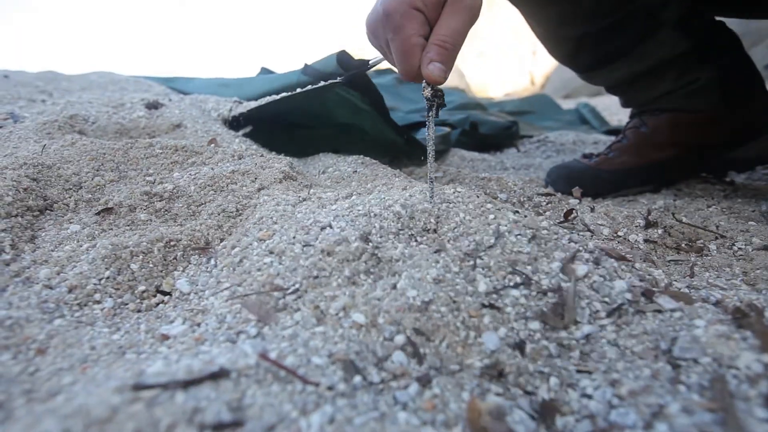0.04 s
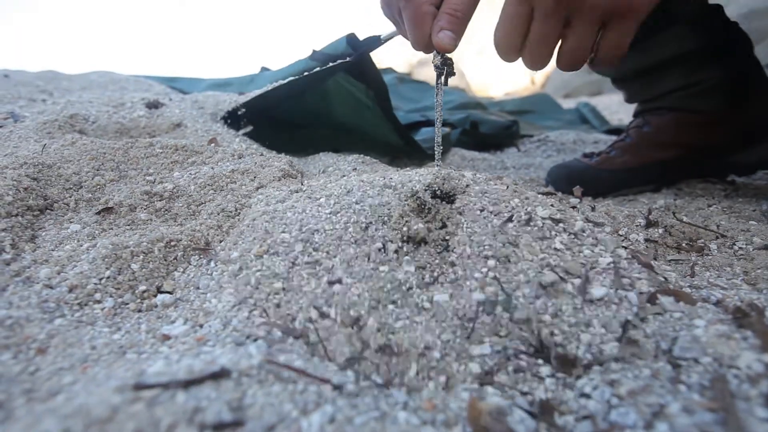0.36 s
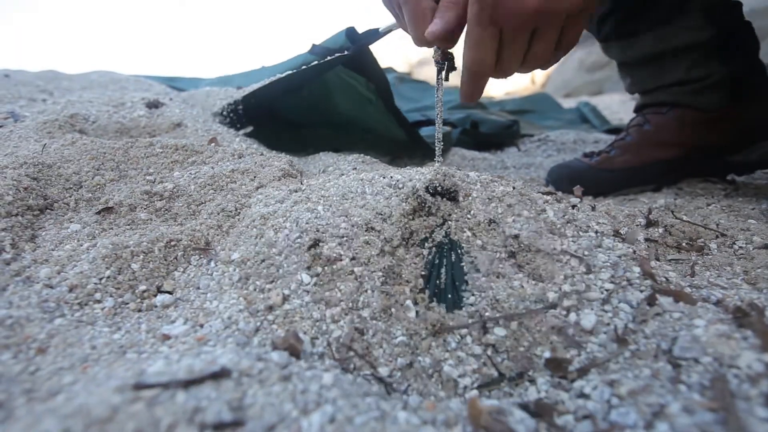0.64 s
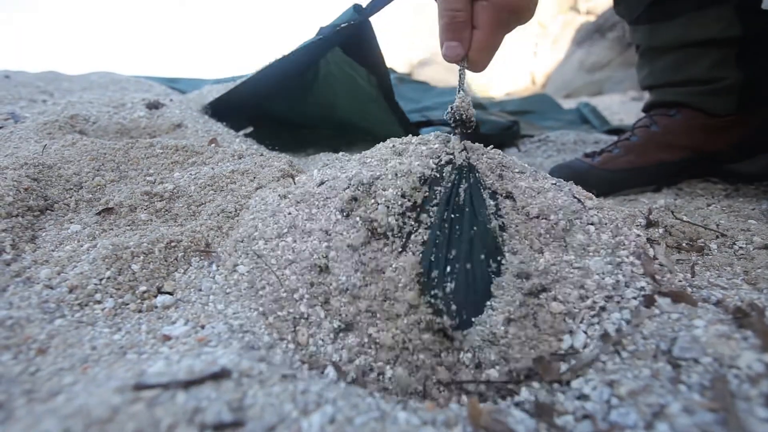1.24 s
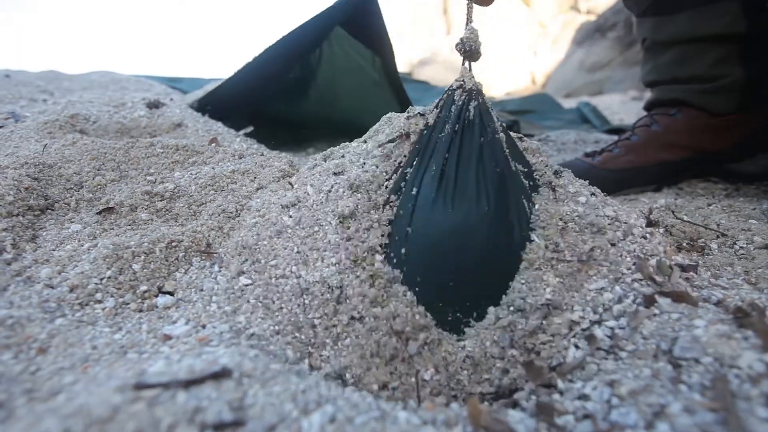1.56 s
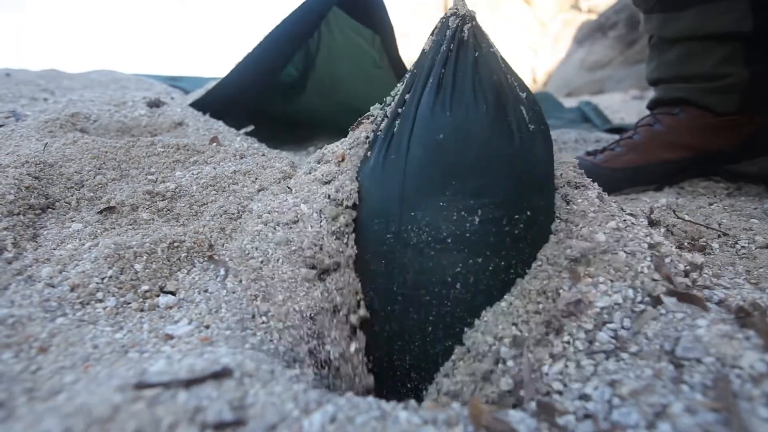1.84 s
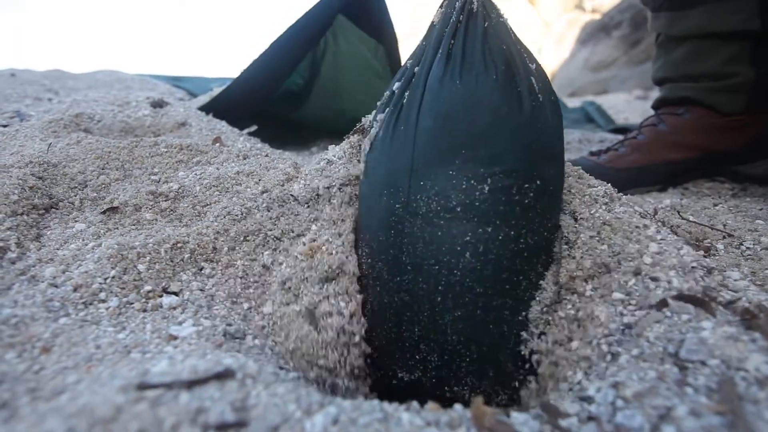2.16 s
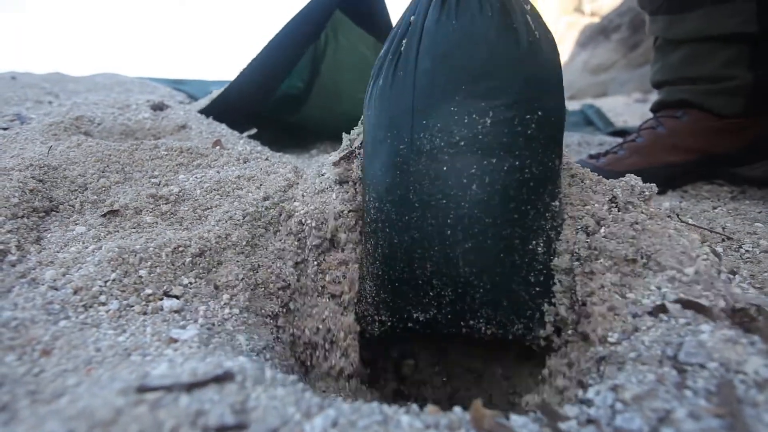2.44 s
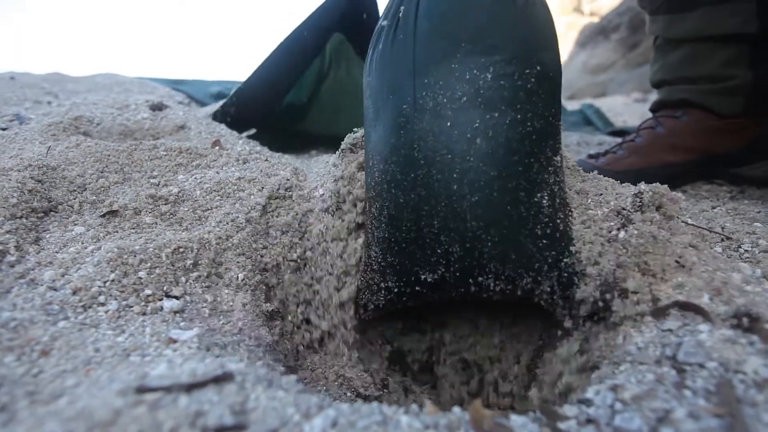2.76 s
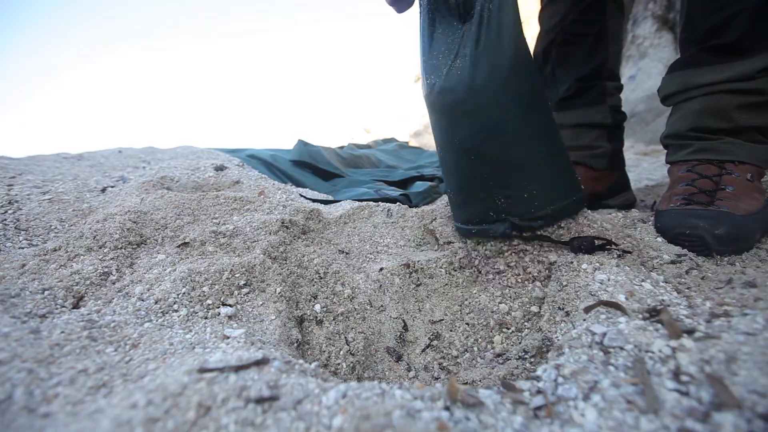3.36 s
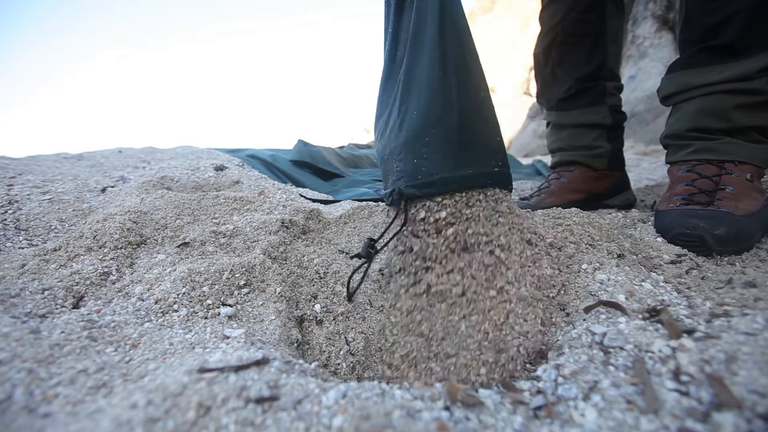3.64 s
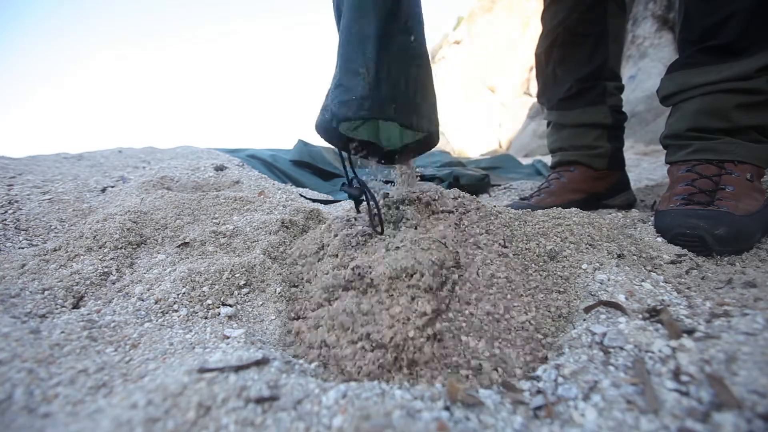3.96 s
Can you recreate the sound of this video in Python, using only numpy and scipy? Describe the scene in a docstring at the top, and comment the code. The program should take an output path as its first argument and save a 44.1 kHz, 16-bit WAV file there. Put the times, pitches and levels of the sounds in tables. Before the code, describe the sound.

Close up on a beach, gritty sand slips, trickles, then streams off a cloth bag being lifted out, with small pebble ticks and fabric scuffs. The bag thuds softly and empties in two spurts and a longer pour.

```python
"""A cloth bag buried in coarse beach sand is drawn up by its cord, heard close and in mono.
First the mound slips in a hiss of countless grains, with a few pebble ticks and a soft thud of the bag.
The slide thins to a trickle, the cloth scuffs, and the cord creaks once as it takes the load.
Sand streams off the rising bag, the cloth rubs again, and the mound caves into the hole.
Last, the bag thuds as it lifts clear and empties itself in two spurts and a long pour."""
import sys
import numpy as np
from scipy import signal
from scipy.fft import rfft, irfft
from scipy.io import wavfile

SR = 44100
rng = np.random.default_rng(int(sys.argv[2]) if len(sys.argv) > 2 else 0)


def to_wav(s):
    """Save 16-bit WAV."""
    ch = np.atleast_2d(s).T  # columns
    pcm = np.round(np.clip(ch, -1, 1) * 32767)  # PCM
    wavfile.write(sys.argv[1], SR, pcm.astype(np.int16))


N = 176400

# Fader moves of each sand flow (time [s], treble hiss [dB], mid crunch [dB], low rustle [dB])
MOUND_SLIP = [(0, -29.5, -29, -37.5), (.22, -30.5, -30, -40.5), (.3, -21, -23.5, -32),
              (.34, -21, -20.5, -38.5), (.38, -21.5, -26, -34), (.43, -23, -24, -41), (.535, -25, -28, -39),
              (.58, -31, -36.5, -53)]
TRICKLE = [(.58, -30, -34, -42), (.7, -35.5, -38, -44), (.76, -34.5, -42.5, -46.5),
           (.82, -40, -40.5, -46.5), (.87, -39.5, -39, -43)]
OFF_THE_BAG = [(.87, -31, -38, -52), (.9, -34, -35.5, -42), (.95, -23.5, -26, -35.5), (.98, -25, -26, -36),
               (1.14, -19, -23, -34), (1.29, -19, -22.5, -37), (1.35, -22.5, -26, -34),
               (1.52, -21, -24.5, -40.5), (1.63, -18.5, -23, -37.5), (1.8, -21.5, -26, -38),
               (1.95, -26, -26.5, -34.5), (2.06, -26, -30.5, -43.5)]
CAVE_IN = [(2.06, -27.5, -30.5, -44), (2.19, -24.5, -26.5, -40), (2.3, -27.5, -29, -37.5),
           (2.45, -24.5, -29, -38), (2.6, -26.5, -30.5, -39), (2.7, -21, -29.5, -45),
           (2.76, -26, -33, -40.5), (2.87, -28, -30.5, -40), (2.97, -24.5, -34, -41)]
POUR = [(2.97, -37, -31, -53), (3.0, -20, -23, -35), (3.03, -17.5, -20, -34.5), (3.085, -25.5, -27, -40),
        (3.11, -21, -21.5, -35), (3.146, -19, -22, -32.5), (3.22, -23, -24.5, -38.5),
        (3.29, -21, -22.5, -36.5), (3.35, -17.5, -19.5, -32.5), (3.44, -20, -21, -35.5),
        (3.6, -19, -22, -33.5), (3.69, -24, -24.5, -40), (3.76, -23, -26, -38.5), (3.82, -33, -38.5, -50.5),
        (3.87, -35, -46, -77), (3.92, -34, -39.5, -61), (4, -35, -48, -80)]
# Tone of each flow (frequency [Hz], relative gain [dB])
MOUND_SLIP_EQ = [(35, -47), (60, -16), (167, -10.5), (231, -15.5), (259, -12), (443, -7.5), (869, -8.5),
                 (1200, -4.5), (1350, -7), (1480, -3.5), (2150, -3.5), (2980, -5.5), (3500, -2), (5980, 0),
                 (7720, -3.5), (11200, -18), (15500, -35)]
TRICKLE_EQ = [(40, -24), (100, -8.5), (200, -5.5), (350, -10), (650, -9), (950, -11), (1250, -6.5),
              (1650, -8.5), (2100, -6), (2800, -11), (3500, -4.5), (4600, -7), (7000, -3), (9000, -14),
              (15500, -36)]
OFF_THE_BAG_EQ = [(35, -59), (60, -32), (129, -25), (187, -24.5), (220, -23.5), (305, -23), (433, -19),
                  (559, -17), (869, -20), (976, -18.5), (1590, -10.5), (1740, -10), (2100, -6), (2910, -6),
                  (3930, -1.5), (4320, -3), (6870, 1), (10200, -11.5), (15500, -31.5)]
CAVE_IN_EQ = [(35, -52), (60, -37), (115, -20.5), (201, -17), (291, -20.5), (312, -21.5), (464, -13),
              (792, -16), (976, -14), (1590, -8.5), (1790, -11), (2050, -6), (2310, -9), (2590, -5.5),
              (2780, -7), (4630, -4.5), (6870, 1), (10200, -13), (15500, -31)]
POUR_EQ = [(35, -61), (60, -35), (167, -19), (242, -16), (475, -12), (521, -10.5), (810, -14), (976, -12),
           (1070, -11.5), (1550, -10.5), (2410, -10.5), (3500, -6), (5200, -5), (6410, -0.5), (7030, -2),
           (15500, -33.5)]
# Edges of the rustle, crunch and hiss bands (frequency [Hz])
BAND_EDGES = [60, 1300, 5000, 16000]
# The flows in playing order (fader moves, tone)
FLOWS = [(MOUND_SLIP, MOUND_SLIP_EQ), (TRICKLE, TRICKLE_EQ), (OFF_THE_BAG, OFF_THE_BAG_EQ),
         (CAVE_IN, CAVE_IN_EQ), (POUR, POUR_EQ)]
GRAINS_PER_S, FULL_FLOW_DB, CROWDING = 30000, -20, .7  # density at full flow; it goes as power ** CROWDING
CLUMP_HZ, CLUMP_DB, BAND_FLUTTER_DB = 48, .5, .12


def sand(flow, eq):
    """Grain impacts blur into a hiss, denser when more sand moves, falling in loose clumps."""
    t = np.arange(N) / SR
    times, hiss, crunch, rustle = np.transpose(flow)
    inside_s = np.minimum(t - times[0], times[-1] - t)
    crossfade = np.sqrt(np.clip(.5 + inside_s / .04, 0, 1))  # equal power, 40 ms at each end
    flow_power = amp(np.interp(t, times, hiss) - FULL_FLOW_DB) ** 2
    density = np.minimum(GRAINS_PER_S * flow_power ** CROWDING, SR)
    clumps_db = CLUMP_DB * wander(CLUMP_HZ)
    stream = np.zeros(N)
    for k, fader in enumerate([rustle, crunch, hiss]):
        clicks = impacts(density, spread_db=3) / np.sqrt(density)  # same power at any density
        grains = coloured(clicks, eq, BAND_EDGES[k:k + 2])
        flutter_db = clumps_db + BAND_FLUTTER_DB * wander(CLUMP_HZ)
        stream += grains * amp(np.interp(t, times, fader) + flutter_db)
    return stream * crossfade


GRIT_PER_S, GRIT_DB, GRIT_FOLLOW = 140, -27.5, .95  # GRIT_FOLLOW: dB of grit per dB of hiss


def grit():
    """Grit of many sizes bounces clear of the stream: bright ticks that ride the level of the hiss."""
    times, hiss = np.vstack([flow for flow, _ in FLOWS]).T[:2]
    flow_db = np.interp(np.arange(N) / SR, times, hiss) - FULL_FLOW_DB
    pitches_hz = np.geomspace(3200, 10000, 24)
    ticks = np.zeros(N)
    for hz in pitches_hz:
        bounces = impacts(GRIT_PER_S / len(pitches_hz), spread_db=2.5)
        ticks += signal.oaconvolve(bounces, pebble(hz))[:N]
    return amp(GRIT_DB + GRIT_FOLLOW * flow_db) * ticks


# Single pebble ticks (time [s], peak level [dB], pitch [Hz])
PEBBLES = [(.031, -19, 5500), (.1478, -12, 4400), (.723, -19, 6500), (.828, -17, 7000), (.957, -11, 4700),
           (.964, -4, 7150), (.966, -10, 7000), (1.365, -7, 7240), (1.478, -19, 6500)]
STRIKE_S, RING_CYCLES, TICK_TOP_HZ = .00008, 2.8, 11000


def pebble(hz):
    """A struck stone rings for a few cycles, its very top end rolled off; peak 1."""
    t = np.arange(256) / SR
    envelope = (1 - np.exp(-t / STRIKE_S)) * np.exp(-t * hz / RING_CYCLES)
    ring = envelope * np.sin(2 * np.pi * hz * t)
    tick = signal.lfilter(*signal.butter(4, TICK_TOP_HZ, fs=SR), ring)
    return tick / abs(tick).max()


# Scuffs of cord and cloth (time [s], decay [s], level [dB], rasp over ring [dB], attack [s])
SCUFFS = [(0.686, .010, -27.5, 8, 0.0011), (0.693, 0.037, -36, -7, 0.0055), (0.8, .008, -30, -17, 0.00049),
          (0.816, 0.019, -31, -18, .008), (1.878, 0.078, -36, -5, .01), (1.924, 0.074, -30, -6, 0.019),
          (3.905, 0.0099, -38, 9, 0.0015)]
# Tone of a scuff's two layers (frequency [Hz], relative gain [dB])
RING_EQ = [(200, -30), (800, -3), (1030, -14), (1180, 6.5), (1400, 6), (1650, -10), (2100, -6), (3000, -36),
           (9000, -55)]
RASP_EQ = [(80, -29), (280, 5), (600, 1), (1000, -3), (2100, 4.5), (2800, -12), (3500, 0), (4600, -12),
           (9000, -26)]


def scuff(decay_s, db, rasp_db, attack_s):
    """Cord and cloth snatch or rub: friction noise with a hollow ring and a wide rasp."""
    t = np.arange(SR // 4) / SR
    ring = coloured(rng.standard_normal(len(t)), RING_EQ)
    rasp = coloured(rng.standard_normal(len(t)), RASP_EQ)
    envelope = np.minimum(t / attack_s, 1) * np.exp(-(t / decay_s) ** 2.2)
    return amp(db) * unit_rms(ring + amp(rasp_db) * rasp) * envelope


CREAK_START_S, CREAK_LENGTH_S, CREAK_DB, CREAK_FADE_DB = 1.0025, .068, -37.5, -8
SLIP_HZ, SLIP_JITTER, BAG_HZ, BAG_RING_S = 107.2, .086, 187, .0042


def cord_creak():
    """The taut cord sticks and slips; each slip nudges the packed bag, which rings dully."""
    t = np.arange(0, CREAK_LENGTH_S, 1 / SR)
    slip_hz = SLIP_HZ * (1 + SLIP_JITTER * wander(SLIP_HZ)[:len(t)])
    slip_count = np.floor(np.cumsum(slip_hz) / SR)
    slips = np.diff(slip_count, prepend=-1) * amp(CREAK_FADE_DB * t / CREAK_LENGTH_S)
    bag_ring = np.exp(-t / BAG_RING_S) * np.sin(2 * np.pi * BAG_HZ * t)
    creak = signal.fftconvolve(slips, bag_ring)
    creak = signal.lfilter(*signal.butter(2, 60, "high", fs=SR), creak)
    return amp(CREAK_DB) * creak / np.std(creak[:len(t)])


# Soft thuds of the shifting bag (time [s], gain [dB], decay [s], pitch [Hz])
THUDS = [(0.323, -46, 0.029, 116), (2.889, -39, 0.033, 107)]
# Partials of a thud (frequency [multiple of the pitch], relative level [dB])
THUD_PARTIALS = [(.85, -5), (1.1, -12.5), (1.4, -19)]


def bag_thud(db, decay_s, hz, attack_s=.0042):
    """The packed bag gives way with a dull, quickly damped push."""
    t = np.arange(SR // 4) / SR
    body = sum(amp(partial_db) * np.sin(2 * np.pi * (hz * ratio * t + rng.random()))
               for ratio, partial_db in THUD_PARTIALS)
    return amp(db) * body * np.minimum(t / attack_s, 1) * np.exp(-t / decay_s)


# Tone of the background air (frequency [Hz], relative gain [dB])
AIR_EQ = [(20, -23), (50, -8), (150, -7.5), (500, -10), (1000, -12.5), (6500, -7), (15000, -18.5)]


def air(db=-43.5):
    """Still outdoor air: a faint, steady bed of noise."""
    return amp(db) * coloured(rng.standard_normal(N), AIR_EQ)


def amp(db):
    return 10 ** (np.asarray(db) / 20)


def unit_rms(x):
    return x / np.sqrt(np.mean(x ** 2) + 1e-20)


def add(mix, start_s, sound):
    """Drops a sound into the mix at its cue."""
    part = mix[round(start_s * SR):][:len(sound)]
    part += sound[:len(part)]


def coloured(x, eq, band=None):
    """Shapes x with an EQ curve, optionally within one soft-edged band; rms 1."""
    hz = np.fft.rfftfreq(len(x), 1 / SR) + 1
    eq_hz, eq_db = np.transpose(eq)
    gain = amp(np.interp(np.log(hz), np.log(eq_hz), eq_db))
    if band is not None:
        gain /= np.sqrt((1 + (band[0] / hz) ** 10) * (1 + (hz / band[1]) ** 10))
    return unit_rms(irfft(rfft(x) * gain, len(x)))


def wander(rate_hz):
    """Smooth random modulation up to about rate_hz; rms 1."""
    hz = np.fft.rfftfreq(N, 1 / SR)
    return unit_rms(irfft(rfft(rng.standard_normal(N)) * np.exp(-(hz / rate_hz) ** 2), N))


def impacts(per_s, spread_db):
    """Random clicks, most small and a few large."""
    size = amp(spread_db * np.minimum(rng.exponential(1, N), 4))
    return size * rng.choice([-1, 1], N) * (rng.random(N) < per_s / SR)


def scene():
    """Sand up front, spot sounds on their cues and air behind, the same in both channels."""
    mix = sum(sand(flow, eq) for flow, eq in FLOWS) + grit() + air()
    add(mix, CREAK_START_S, cord_creak())
    for start_s, db, hz in PEBBLES:
        add(mix, start_s, amp(db) * pebble(hz))
    for start_s, *settings in SCUFFS:
        add(mix, start_s, scuff(*settings))
    for start_s, *settings in THUDS:
        add(mix, start_s, bag_thud(*settings))
    return np.array([mix, mix])


def record(dry):
    """A steep high cut at 15.75 kHz trims the very top of the hiss."""
    high_cut = signal.firwin(511, 15750, window=("kaiser", 9), fs=SR)
    return signal.oaconvolve(dry, high_cut[None], "same")


dry = scene()
out = record(dry)
to_wav(out)
```